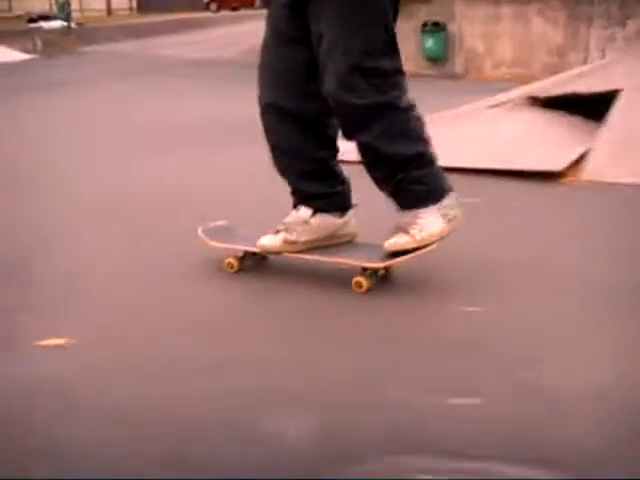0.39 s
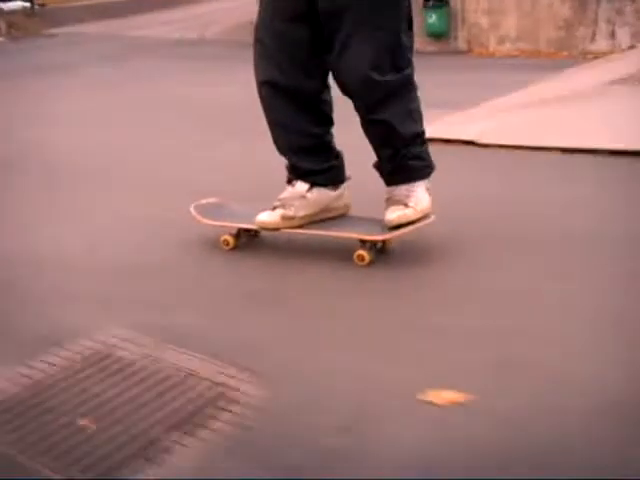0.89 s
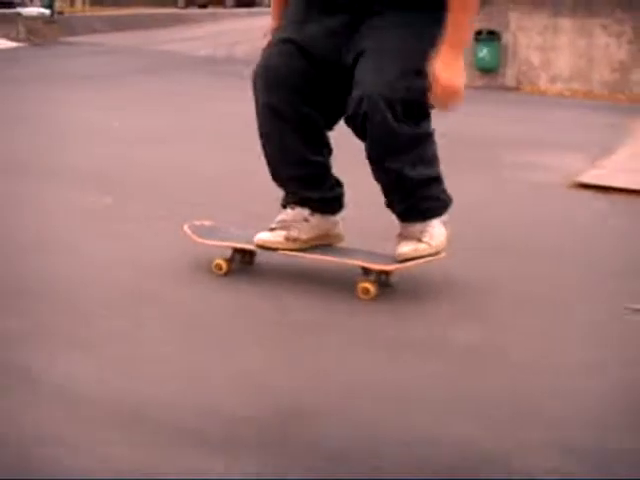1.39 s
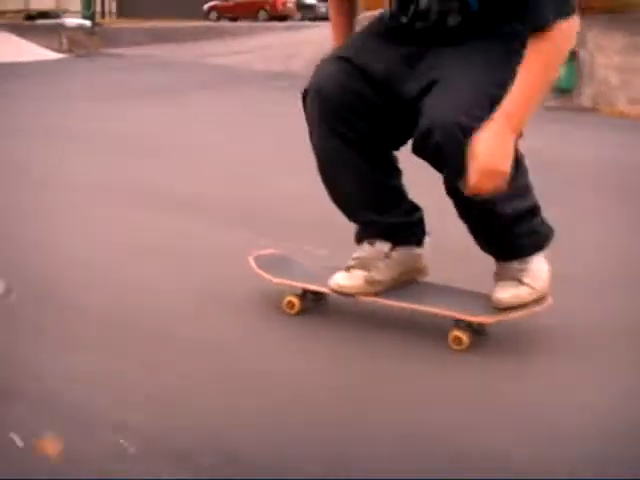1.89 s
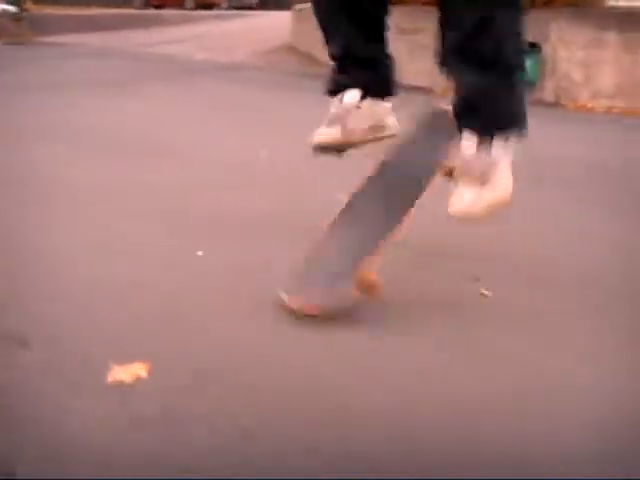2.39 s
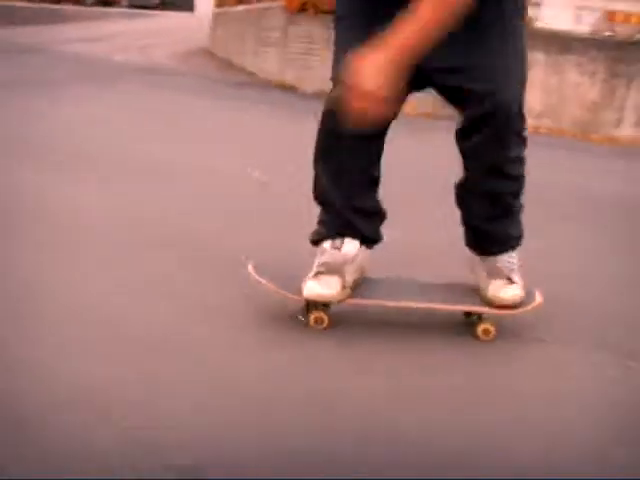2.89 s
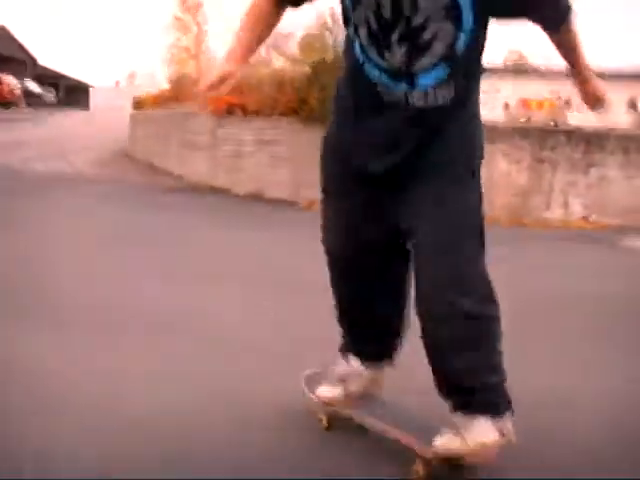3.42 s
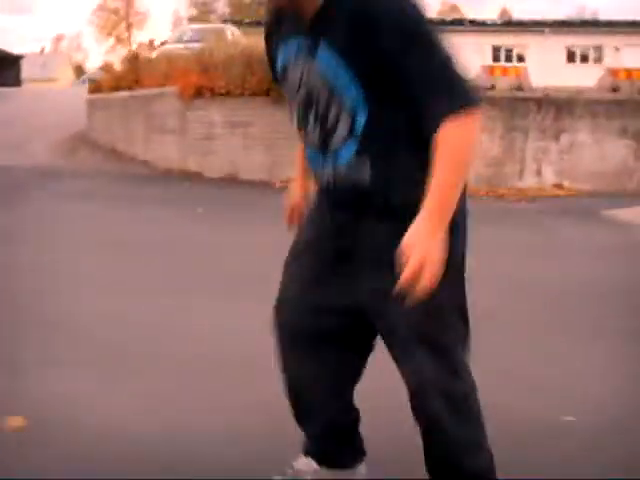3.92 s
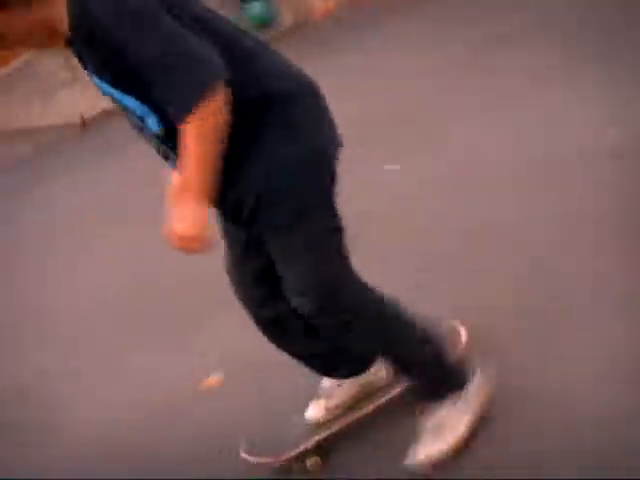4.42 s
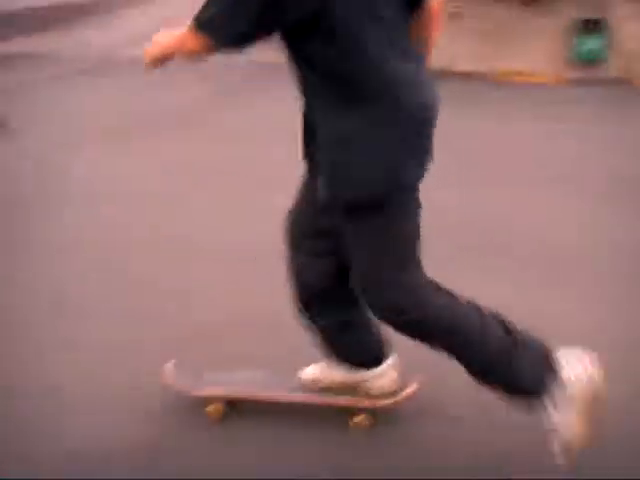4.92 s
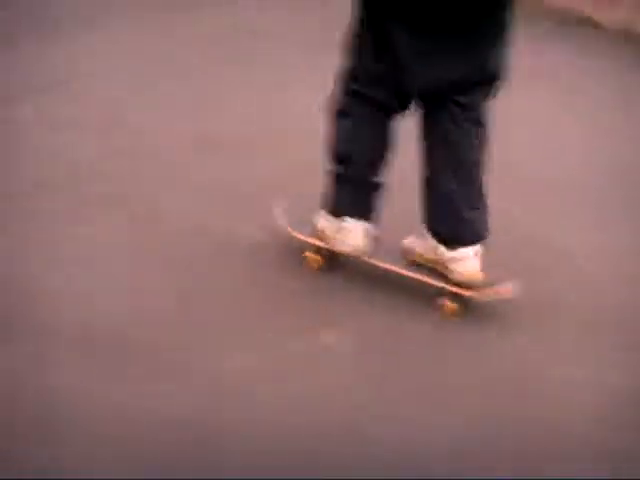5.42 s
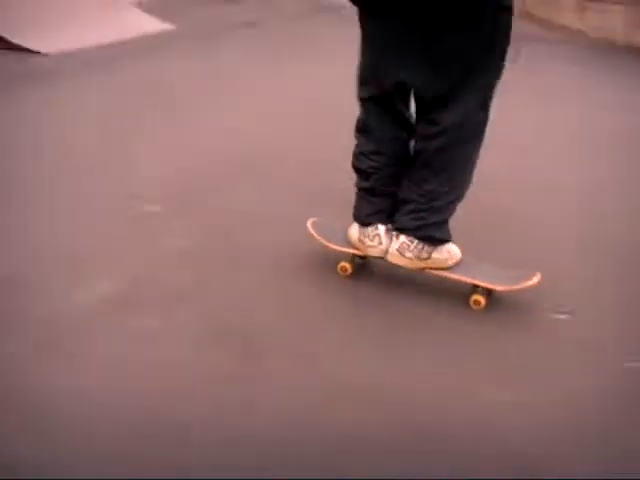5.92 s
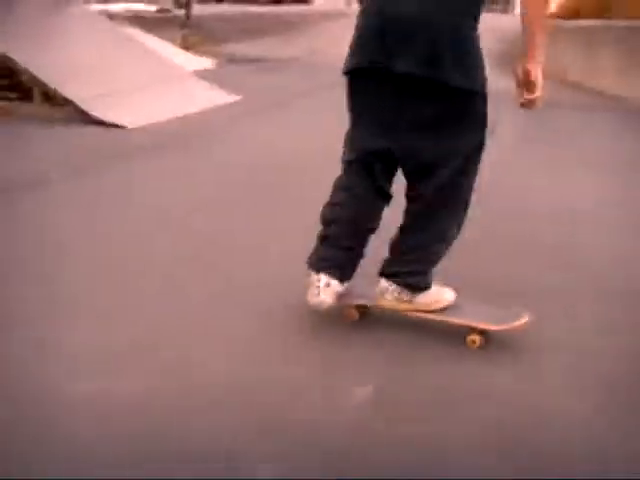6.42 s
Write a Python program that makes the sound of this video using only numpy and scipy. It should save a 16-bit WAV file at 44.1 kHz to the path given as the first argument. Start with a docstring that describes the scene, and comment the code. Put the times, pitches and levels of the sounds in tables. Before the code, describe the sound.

Close outdoor skateboarding on rough asphalt. Hard wheels rumble and drone with small stone ticks and hollow wooden knocks. The tail pops sharply, a clattering landing follows, then a brief squealing wheel skid and the loudest crack. Shoes scrape as the rider pushes, and rolling returns. Light wind buffets a small camcorder microphone that dulls the treble and clips the peaks.

```python
"""A skateboard rolls over rough asphalt beside a small camcorder: stones jolt the wheels and shake the loaded deck.
Blows, a tail pop, a skid and small stones are short noisy pushes that ring the deck's resonances.
Shoes and wheels scrape as filtered, uneven noise; wind at the microphone is low noise swelling in gusts.
The camcorder rounds the peaks, cuts steeply above 6.1 kHz, then clips, which splashes some treble."""
import sys
import numpy as np
from scipy import signal
from scipy.io import wavfile
from scipy.ndimage import uniform_filter1d

SR = 44100
rng = np.random.default_rng(int(sys.argv[2]) if len(sys.argv) > 2 else 0)


def makeup_ratio(level_db):
    """Linear amplitude ratio for a level in decibels (20 dB per factor of ten)."""
    decades = np.asarray(level_db, float) / 20
    return 10 ** decades


def generate_wav(sig):
    """Save sig (samples, or channels by samples) to the path in sys.argv[1] as 16-bit PCM at SR."""
    pcm = np.round(np.clip(np.atleast_2d(sig).T, -1, 1) * 32767).astype(np.int16)
    wavfile.write(sys.argv[1], SR, pcm)


N = 289276  # length [samples]


def band(x, hz, width):
    """Two-pole resonance, gain 1 at the centre."""
    return signal.lfilter(*signal.iirpeak(hz, hz / width, fs=SR), x)


def highpass(x, hz):
    """Second-order cut below hz."""
    return signal.sosfilt(signal.butter(2, hz, "high", fs=SR, output="sos"), x)


def unit(x):
    """Scale to rms 1."""
    return x / np.sqrt(np.mean(x ** 2))


def peak(x, db):
    """Scale to a peak level."""
    return makeup_ratio(db) * x / np.abs(x).max()


def curves(table):
    """Gains of the dB columns, one per sample."""
    s, *columns = np.transpose(table)
    return [makeup_ratio(np.interp(np.arange(N) / SR, s, column)) for column in columns]


def walk(rate):
    """Random levels held 1 / rate s and slewed twice."""
    k = int(SR / rate)
    steps = np.repeat(rng.standard_normal(N // k + 1), k)
    return uniform_filter1d(uniform_filter1d(steps, k), k)[:N]


def stones(rate, spread_db, smear_s, smooth):
    """Random jolts, a few much larger than the rest, each with a short noisy tail, over a smooth share."""
    hit = rng.random(N) < rate / SR
    sizes = hit * makeup_ratio(spread_db * np.minimum(rng.exponential(size=N), 5))
    tail = unit(signal.lfilter([1], [1, -np.exp(-1 / (smear_s * SR))], sizes))
    return (smooth + tail) * rng.standard_normal(N)


def ring(x, peaks):
    """Sum of resonances, neighbours in opposite phase, scaled to rms 1."""
    total = 0
    for k, (hz, width, db) in enumerate(peaks):
        total = total + (-1) ** k * makeup_ratio(db) * band(x, hz, width)
    return unit(total)


# Rolling at the microphone, loud over rough ground and under load, faint while the board is slow;
# levels before they waver: (time [s], lower rumble [dB], upper drone [dB], low deck thrum [dB], wheel ring [dB])
ROLLING_LEVELS = [(0.0, -20, -23.5, -32, -28.5), (.15, -27.5, -26, -33, -25), (.23, -22, -24.5, -32, -26),
                  (.3, -29, -29, -31, -23), (.68, -28, -28.5, -30.5, -25), (.75, -27, -26.5, -31.5, -25.5),
                  (1.2, -27.5, -28, -30, -30), (1.5, -26.5, -28.5, -28, -31), (1.66, -25, -29, -26, -29.5),
                  (1.8, -24.5, -25, -24, -26.5), (2.2, -26.5, -26, -26.5, -33.5),
                  (2.4, -27.5, -28.5, -26.5, -26.5), (2.62, -31.5, -31.5, -30, -33.5),
                  (2.74, -28, -27, -27, -29), (2.86, -31, -32, -32, -35.5), (3.05, -32, -33, -33.5, -37.5),
                  (3.35, -33, -30.5, -34, -41), (3.6, -33.5, -36, -36, -38.5),
                  (4.05, -40.5, -32.5, -44, -43), (4.4, -41, -42.5, -40.5, -49),
                  (4.48, -34.5, -33, -30, -46), (4.54, -35, -30, -30, -29), (4.6, -33, -30.5, -32, -39),
                  (4.75, -37, -28.5, -31, -43), (4.98, -42, -31, -40.5, -48),
                  (5.08, -33.5, -26, -31.5, -39), (5.21, -27, -20.5, -36.5, -23),
                  (5.28, -33, -28, -29.5, -47), (5.36, -29.5, -21.5, -27.5, -46),
                  (5.52, -35.5, -30.5, -32, -42.5), (5.85, -30.5, -29, -35, -30),
                  (6.05, -16, -19, -30.5, -21.5), (6.12, -20, -27, -23, -35),
                  (6.17, -30, -22.5, -25.5, -32), (6.24, -30.5, -31, -40, -39),
                  (6.35, -37, -33, -38, -35.5), (6.44, -34, -32.5, -40, -36.5),
                  (6.56, -24, -25.5, -40, -28)]
# Resonances fed by the rolling wheels, each table: (centre [Hz], width [Hz], level within the group [dB])
RUMBLE_PEAKS = [(530.6, 116, -7), (603, 44.6, -1)]
DRONE_PEAKS = [(665.5, 44, -3.5), (780.3, 44.7, -3), (876, 88, -10.5)]
THRUM_PEAKS = [(134, 66, -6), (196, 110, 2.5), (338, 247, -1.5)]
WHEEL_PEAKS = [(1127, 250, -2.5), (1395, 427, -2.5), (1800, 297, -7), (3030, 3100, -22)]


def rolling():
    """The same stones shake the deck low and the wheels high."""
    jolts = stones(rate=1000, spread_db=3.1, smear_s=0.00041, smooth=1.31) * makeup_ratio(0.76 * walk(11))
    groups = (RUMBLE_PEAKS, DRONE_PEAKS, THRUM_PEAKS, WHEEL_PEAKS)
    total = np.zeros(N)
    for gain, peaks in zip(curves(ROLLING_LEVELS), groups):
        waver = makeup_ratio(2.0 * walk(14))  # each group wavers on its own
        total += gain * waver * ring(jolts, peaks)
    return highpass(total, 100)


SPREAD = 0.55  # width of a common crack as a share of its centre

# Single blows on the deck, levels before the deck rings:
# (time [s], crack peak [dB], crack centre [Hz], knock peak [dB], contact time [s])
DECK_BLOWS = [(.222, -10, 2800, -15, 0.0018), (0.277, -10.5, 3200, -30, 0.003),
              (.316, -10, 3600, -30, .0024), (0.5578, -11.5, 2300, -19, .0012),
              (.6409, -12.5, 1400, -22, .0026), (.668, -16, 1240, -31, .0031),
              (1.256, -16, 1600, -23, 0.0025), (1.2846, -13, 2000, -23, .0023),
              (1.628, -22, 4500, -16, 0.0018), (1.652, -9, 1480, -2.5, 0.0028),
              (1.755, -13, 2200, -5, .004), (1.7918, -24, 1520, -7.5, .0015),
              (1.8395, -29, 1220, -8.5, .0015), (1.9116, -28, 1440, -11, 0.0022),
              (1.9893, -15, 1600, -3, 0.0017), (2.1338, -30, 1210, -15.5, 0.0029),
              (2.348, -5, 4230, -20, .004), (2.503, -16.5, 1270, -28, .011),
              (2.6436, -14.5, 2500, -25, 0.01), (2.6626, 3.5, 1800, -13, 0.01),
              (2.6685, -0.5, 2000, -13, .009), (2.6776, -2.5, 1700, -12.5, .006),
              (2.684, -3.5, 3520, -15, .012), (2.69, 1, 2500, -11, 0.0053), (2.695, 1.5, 1950, -20, .004),
              (2.7016, -3, 1390, -6, .0037), (2.7267, -22, 1560, -12, .004),
              (3.102, -15.5, 2100, -26, 0.0034), (3.3862, -4, 3730, -37, .0041),
              (3.400, -6, 1307, -12.5, .02), (3.425, -8, 1505, -13.5, .012),
              (3.5941, -12.5, 2900, -36, 0.004), (3.6024, -13.5, 2260, -34, 0.0031),
              (3.766, 5.5, 2190, -26, 0.0067), (3.773, 10, 2180, -6, .005), (3.7861, 0, 2140, -11, 0.0077),
              (3.918, -21, 1230, -26, .0017), (3.9401, -17.5, 4400, -24.5, 0.0025),
              (4.0524, -27, 1960, -14.5, .0019), (4.0612, -8, 1900, -27, .003),
              (4.0816, -6.5, 1900, -23, 0.0041), (4.108, -11.5, 2320, -24, 0.0028),
              (4.3674, -15, 1900, -36, .007), (4.521, -15, 1210, -25, 0.0026),
              (4.6525, -8.5, 2000, -19.5, 0.0024), (4.7226, -13, 1460, -14, .0016),
              (4.8716, -8, 2400, -37, .002), (5.027, -10, 1880, -28, .001),
              (5.3832, -13.5, 2440, -26, 0.0014), (5.460, -27, 1240, -19, .0023),
              (5.9371, -13, 1220, -13.5, 0.0013), (6.0993, -21.5, 1480, -3.5, 0.0012),
              (6.2848, -2.5, 2070, -3, 0.0033), (6.3203, -40, 1200, -8, 0.0081)]


def single_blows():
    """Separate contacts with the deck, each with a broad crack."""
    return [(*row, SPREAD) for row in DECK_BLOWS]


# The tail snaps on the ground, levels before the deck rings:
# (time [s], crack peak [dB], crack centre [Hz], knock peak [dB], contact time [s])
TAIL_POP = [(2.4395, 0, 4250, -12.5, .005), (2.4415, -2, 1800, -10, .006), (2.4455, 4, 2460, -14, .009)]


def tail_pop():
    """The tail snaps on the ground in quick contacts whose cracks ring narrowly."""
    return [(*row, 0.18) for row in TAIL_POP]


def skid():
    """The wheels skid sideways and chatter: evenly spaced contacts squeal near one pitch, dying at the end."""
    start_s, gap_s, count = 3.3928, 0.0061, 8
    crack_db, knock_db, centre_hz = 5.5, -16.5, 2960
    contact_s, spread = 0.005, 0.17
    rows = []
    for k in range(count):
        fade_db = 12 * (k / count) ** 4
        rows.append((start_s + k * gap_s, crack_db - fade_db, centre_hz, knock_db - fade_db, contact_s, spread))
    return rows


def stone_ticks():
    """Small stones tick against the deck at random times, louder where the rumble is louder."""
    count, over_rumble_db, scatter_db = 35, 3, 2.5
    middle_hz, scatter_octaves, contact_s = 1900, 0.5, 0.0015
    s, rumble_db = np.transpose(ROLLING_LEVELS)[:2]
    rows = []
    for when, (size, pitch) in zip(rng.random(count) * N / SR, rng.standard_normal((count, 2))):
        crack_db = np.interp(when, s, rumble_db) + over_rumble_db + scatter_db * size
        hz = min(middle_hz * 2 ** (scatter_octaves * pitch), 6000)
        rows.append((when, crack_db, hz, crack_db - 7, contact_s, SPREAD))
    return rows


def contact_push(noise, crack_db, hz, knock_db, contact, spread):
    """A click and a short noisy push force out a crack near hz and a low knock."""
    t = np.arange(len(noise)) / SR
    rise = np.minimum(t / (0.0003 + 0.12 * contact), 1)
    click = 1.85 * np.exp(-((t - .0005) / .00008) ** 2)
    force = noise * rise * np.exp(-(t / contact) ** 2) + click
    # a focused crack stands on a broad one, which grows with the spread
    focused = band(force, hz, np.clip(spread, .08, 1.5) * hz)
    broad = spread * band(force, 2 * hz, 4 * hz)
    crack = band(focused + broad, hz, 4.6 * hz)
    knock = band(band(band(force, 620, 1000), 560, 1200), 600, 2400)
    return peak(crack, crack_db) + peak(knock, knock_db)


# What the struck deck and trucks ring with: (frequency [Hz], level before the mix [dB], time to fall 60 dB [s])
DECK_MODES = [(220, -23, 0.057), (488, -0.5, 0.045), (752, -1.5, 0.086), (954, -2.5, .025),
              (1440, 3.5, 0.033), (1793, -1.5, 0.02), (2190, -1.5, 0.037), (2324, -8, 0.04),
              (2900, -4.5, 0.052), (3300, -20, 0.02), (3900, -12.5, 0.045), (4400, -12.5, 0.0096),
              (5000, -20, 0.0043), (5900, -5, 0.0039)]


def blows():
    """Every contact pushes the deck, which rings on in its modes; the push itself is heard too."""
    length = 2048  # samples for one contact
    push = np.zeros(N + length)
    for s, *contact in single_blows() + tail_pop() + skid() + stone_ticks():
        i = int(s * SR)
        push[i:i + length] += contact_push(rng.standard_normal(length), *contact)
    push = push[:N]
    modes = np.zeros(N)
    for hz, db, t60 in DECK_MODES:
        width = np.log(1000) / np.pi / t60
        modes += makeup_ratio(db) * band(push, hz, width)
    return makeup_ratio(4.5) * modes + makeup_ratio(2) * push


# Steady grit under the wheels, levels before filtering and flicker: (time [s], rasp [dB], hiss [dB])
GRIT_LEVELS = [(0.0, -34, -36.5), (.4, -31.5, -36), (.55, -33, -38), (1.0, -38.5, -36.5), (1.7, -36.5, -36),
               (2.1, -47.5, -44), (2.5, -30, -40), (2.9, -49, -42), (3.5, -35.5, -37.5), (3.85, -39.5, -39),
               (4.4, -41, -36.5), (4.58, -34, -34.5), (4.97, -29.5, -32), (5.45, -40, -42), (5.6, -35, -35),
               (6.4, -44, -40.5), (6.56, -33, -37)]
# Soles and wheels dragged over asphalt or grip tape, levels added to the grit:
# (start [s], length [s], rasp [dB], hiss [dB], growth over the length [dB])
DRAGS = [(0.256, 0.032, -30, -36, -4), (.4, 0.021, -30, -33, -1.5), (1.215, 0.065, -32, -39, 1),
         (2.194, 0.14, -36, -35, 10.5), (2.349, 0.036, -17, -18, -10), (2.707, 0.047, -31, -33.5, -4.5),
         (3.468, 0.048, -35, -37, -8), (3.926, 0.036, -31, -28, -1), (3.983, 0.14, -24, -27.5, -1),
         (4.628, .24, -24, -27, -2.5), (4.863, 0.042, -21, -24.5, -1.5), (5.03, .2, -31, -39, 6),
         (5.248, 0.13, -29.5, -36, -3.5), (5.55, .06, -36, -33, 0), (5.943, .12, -32.5, -34.5, 6.5),
         (6.12, 0.073, -28.5, -33, 1.5), (6.249, 0.036, -32, -35, -1), (6.47, 0.032, -32, -32.5, -2)]


def scuffs():
    """Gains of rasp and hiss: the steady grit, and each drag as attack, hold and release."""
    attack_s, release_s = 0.013, 0.02
    t = np.arange(N) / SR
    gains = np.array(curves(GRIT_LEVELS))
    for s, length, rasp_db, hiss_db, growth_db in DRAGS:
        attack = np.clip((t - s) / attack_s, 0, 1)
        release = np.exp(-np.maximum(t - s - length, 0) / release_s)
        growth = makeup_ratio(growth_db * np.clip((t - s) / length, 0, 1))
        gains += makeup_ratio([[rasp_db], [hiss_db]]) * attack * release * growth
    return gains


# Resonances of the scrape, each table: (centre [Hz], width [Hz], level within the group [dB])
RASP_PEAKS = [(1440, 465, -0.3), (1900, 406, 0.57), (2310, 276, 0.7), (2720, 240, -5.5)]
HISS_PEAKS = [(3096, 350, -0.5), (4400, 2230, 0.35), (6370, 3400, 1.5)]


def scraping():
    """Grit catches and slips in uneven bursts; in the hiss single grains crackle."""
    rasp, hiss = scuffs()
    grit = stones(rate=900, spread_db=0.94, smear_s=0.0039, smooth=0.37) * makeup_ratio(0.38 * walk(19))
    grains = stones(rate=60, spread_db=1.5, smear_s=0.0027, smooth=0.05)
    crackle = ring(grit, HISS_PEAKS) + makeup_ratio(-6) * unit(band(grains, 5230, 2800))
    return highpass(rasp * ring(grit, RASP_PEAKS) + hiss * crackle, 1100)


# Gusts on the microphone: (centre [s], time from centre to 1/e [s], buffet [dB], flutter [dB])
WIND_GUSTS = [(0.0, .12, -43, -42), (.5, 0.093, -49, -56), (1.6, .25, -52.5, -39.5),
              (2.096, 0.17, -50, -40), (2.68, 0.072, -45, -43), (2.92, 0.074, -49, -55),
              (3.42, .06, -45, -53), (4.255, 0.12, -38.5, -42), (4.734, 0.16, -36.5, -30.5),
              (6.375, 0.11, -46, -43)]
# The buffet, then the flutter: (centre [Hz], width of the first of two resonances [Hz])
WIND_BANDS = [(50, 20), (125, 65)]


def wind():
    """Slow buffeting and a higher flutter below the rumble; each gust swells and fades as a bell."""
    noise, t = rng.standard_normal(N), np.arange(N) / SR
    breeze_db = np.array([[-54.5], [-50]])  # buffet, flutter, around which the breeze wavers
    gains = makeup_ratio(breeze_db + 4 * walk(18))
    for s, length, *db in WIND_GUSTS:
        gains += makeup_ratio(db)[:, None] * np.exp(-((t - s) / length) ** 2)
    total = np.zeros(N)
    for gain, (hz, width) in zip(gains, WIND_BANDS):
        total += gain * unit(band(band(noise, hz, width), hz, 2 * width))
    return total


def scene():
    """All sources at one microphone, as a single channel."""
    return (rolling() + blows() + scraping() + wind())[None]


def low_pass(x):
    """Removes everything above the highest recorded frequency."""
    return signal.sosfilt(signal.butter(12, 15900, fs=SR, output="sos"), x)


def record(dry):
    """The input stage rounds the peaks; after the steep top cut the overshoot is clipped and splashes treble."""
    squash, overload = 0.77, 0.72  # soft and hard ceilings, full scale 1
    rounded = squash * np.tanh(dry / squash)
    rounded = signal.lfilter(*signal.butter(1, 45, "high", fs=SR), rounded)
    narrow = signal.sosfilt(signal.ellip(14, .2, 100, 6120, fs=SR, output="sos"), rounded)
    clipped = np.clip(narrow, -overload, overload)
    # the output stage dulls the highest splash
    out = signal.sosfiltfilt(signal.butter(1, 10500, fs=SR, output="sos"), clipped)
    return low_pass(out)


dry = scene()
out = record(dry)
generate_wav(out)
```